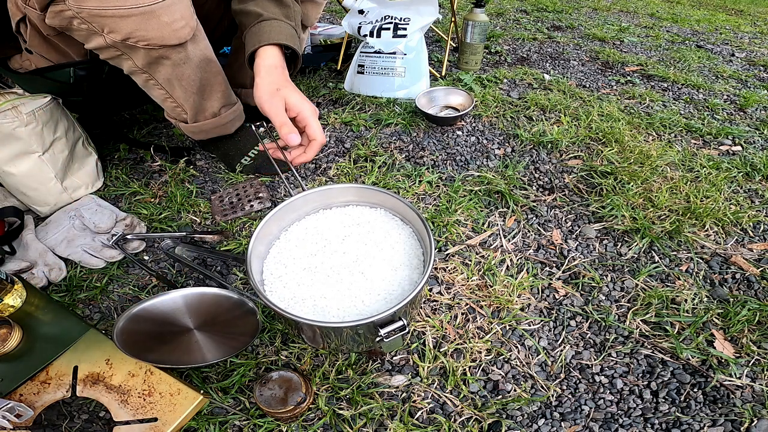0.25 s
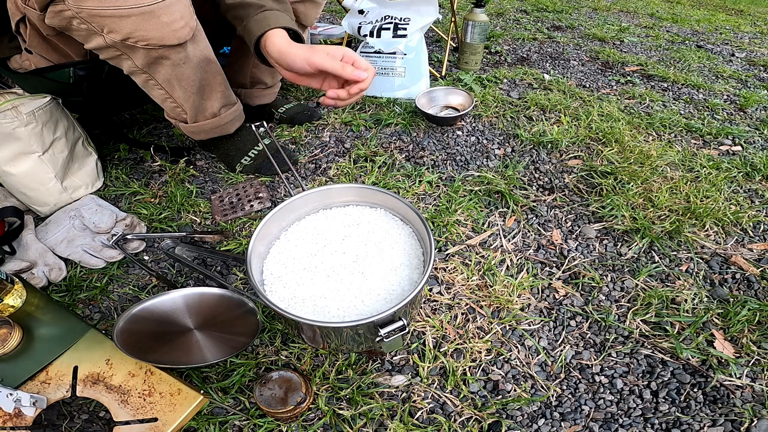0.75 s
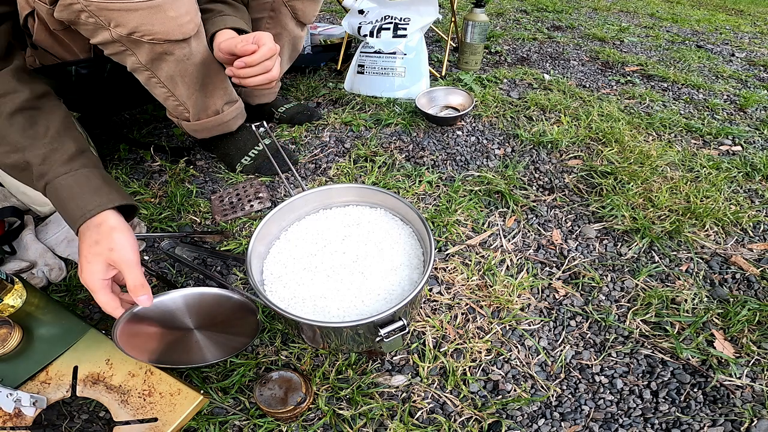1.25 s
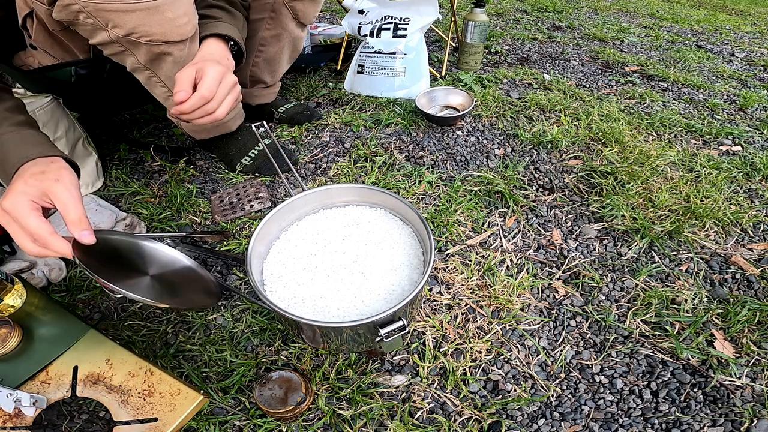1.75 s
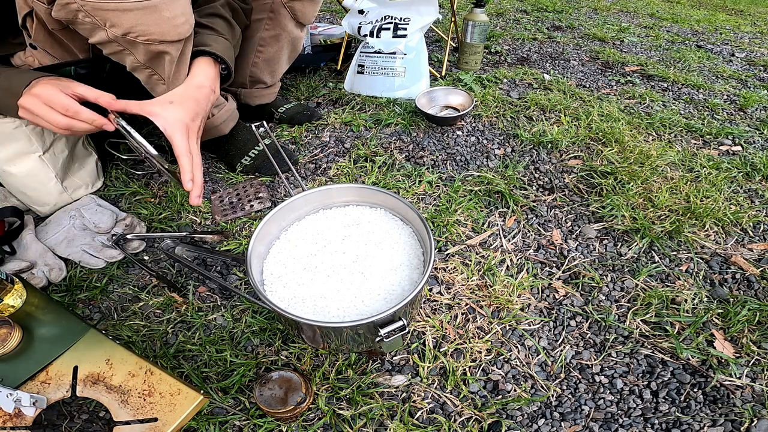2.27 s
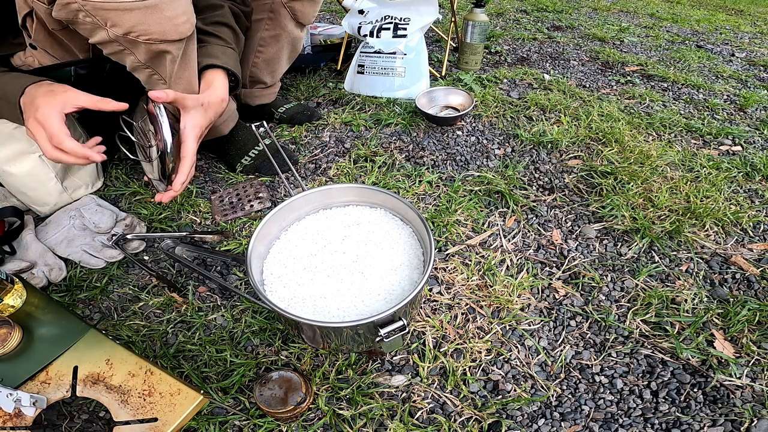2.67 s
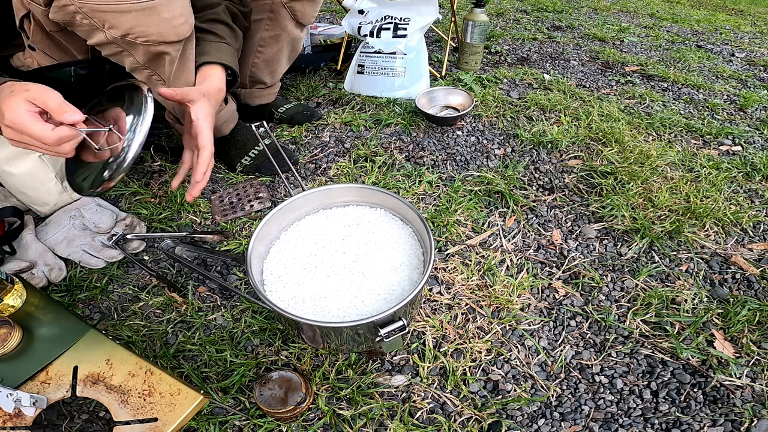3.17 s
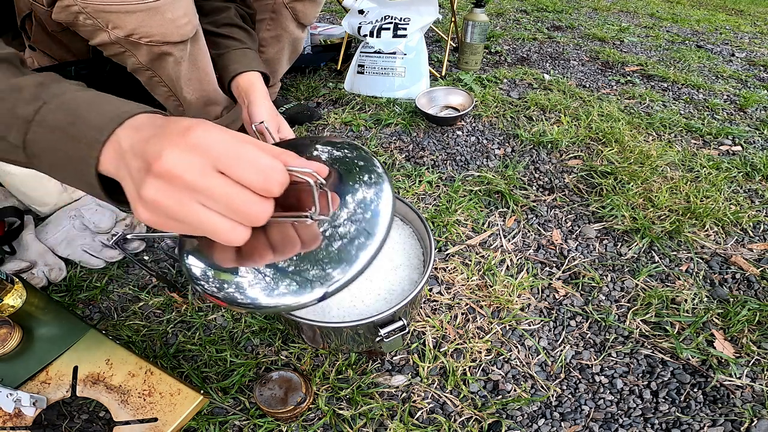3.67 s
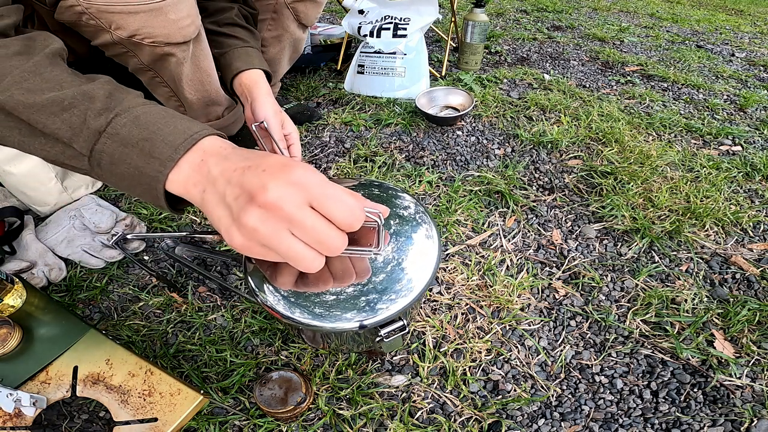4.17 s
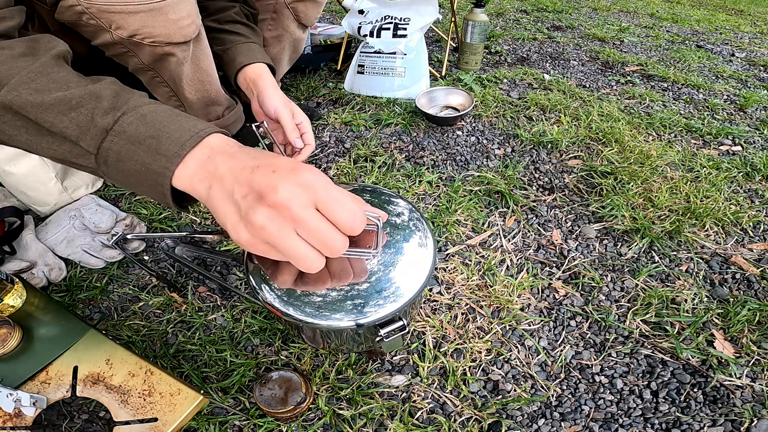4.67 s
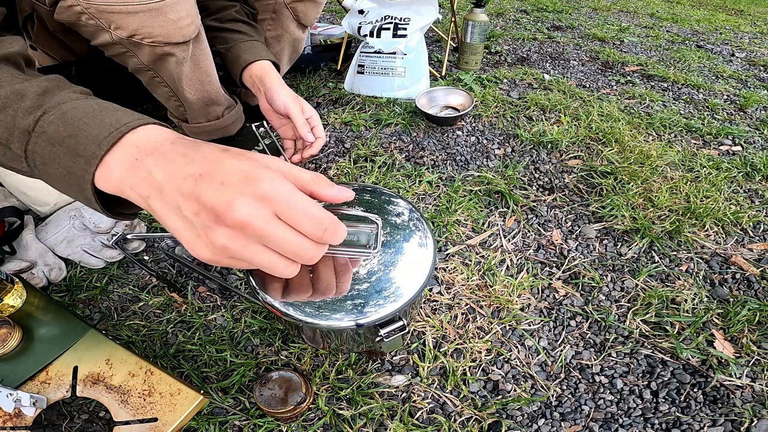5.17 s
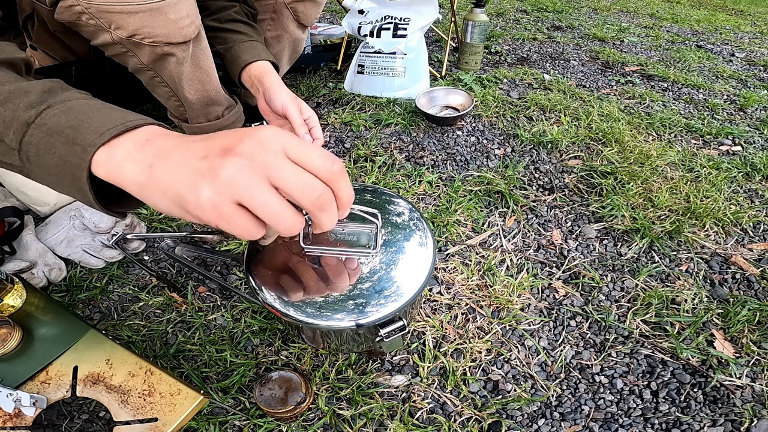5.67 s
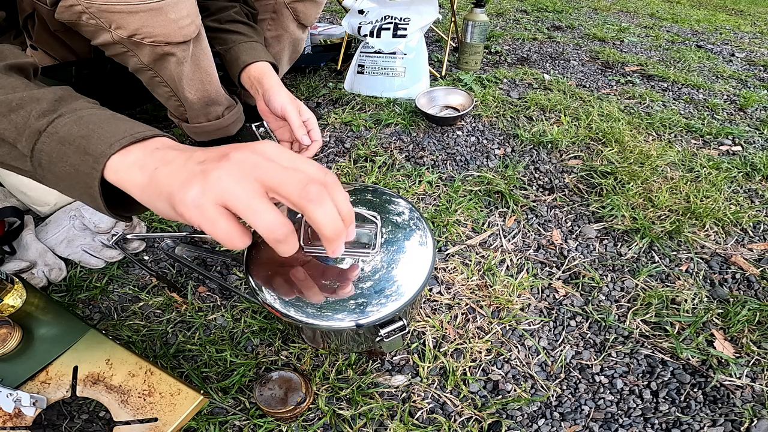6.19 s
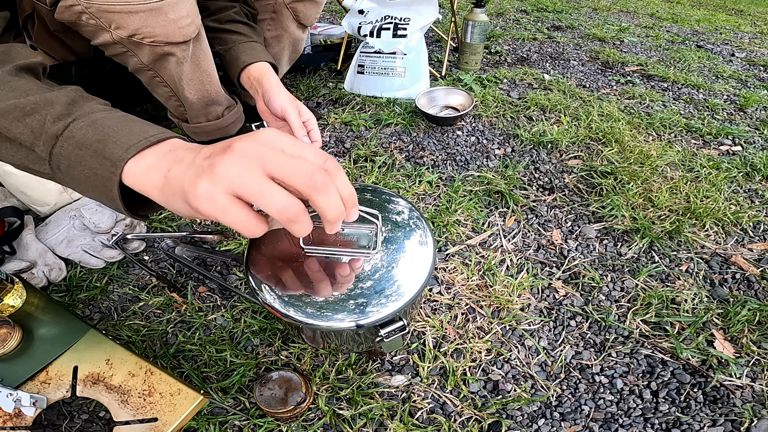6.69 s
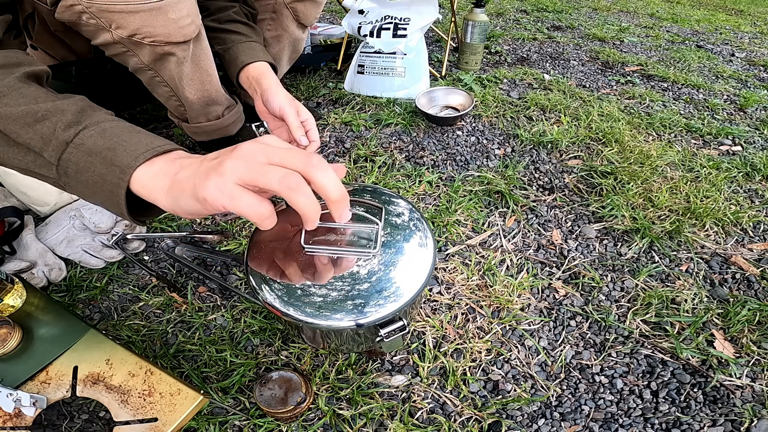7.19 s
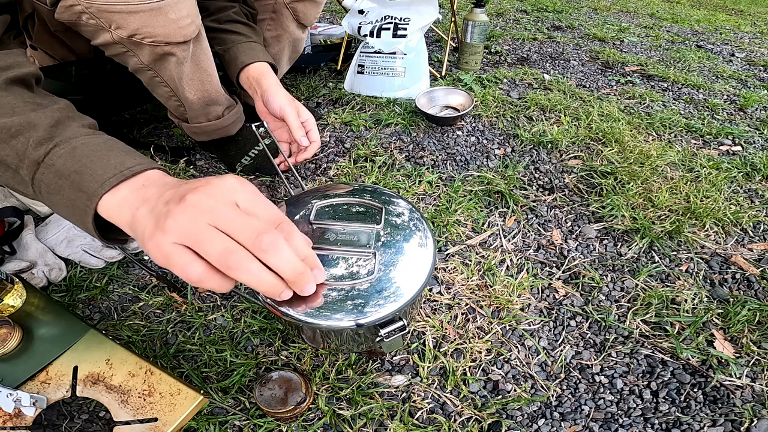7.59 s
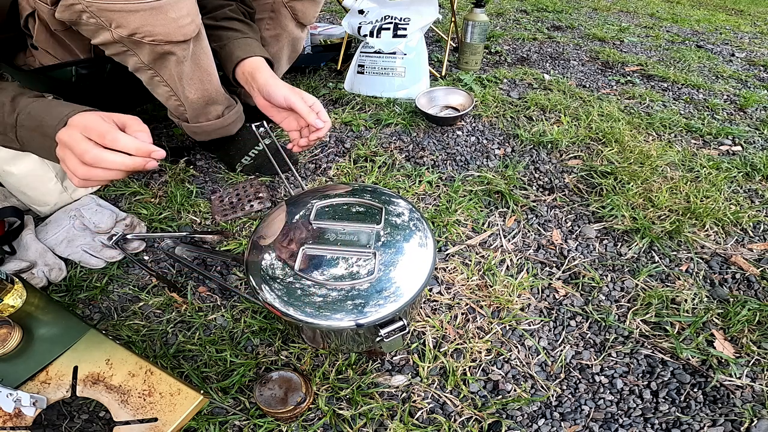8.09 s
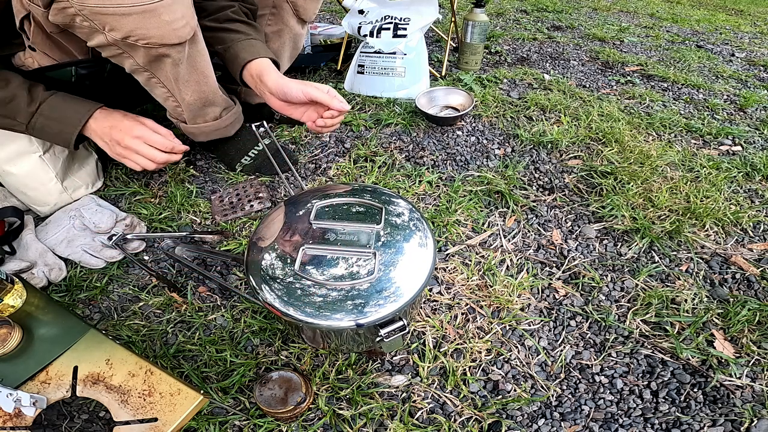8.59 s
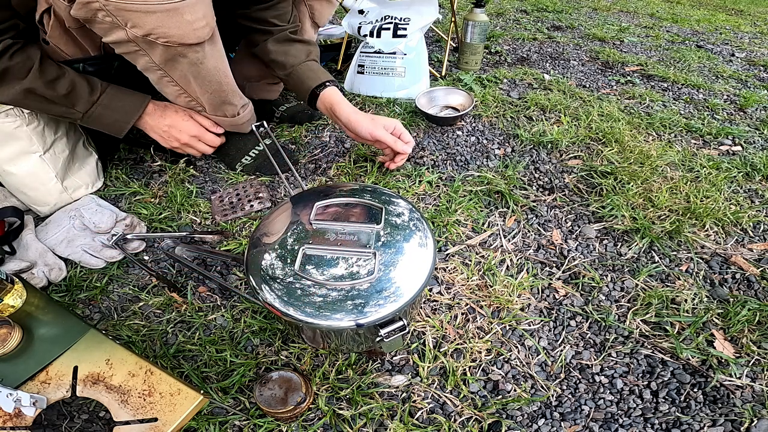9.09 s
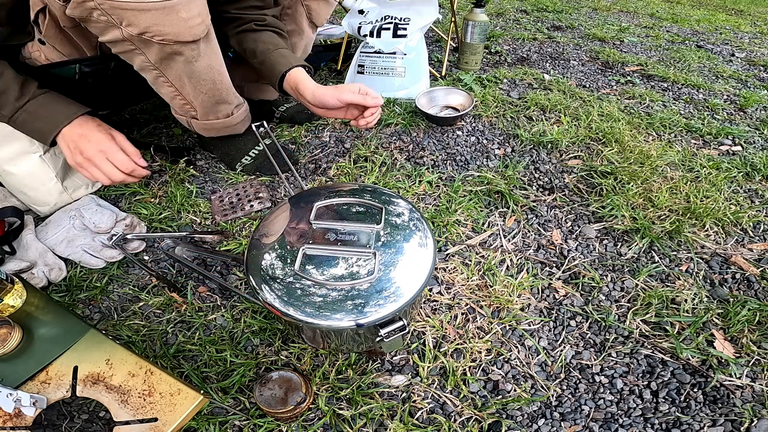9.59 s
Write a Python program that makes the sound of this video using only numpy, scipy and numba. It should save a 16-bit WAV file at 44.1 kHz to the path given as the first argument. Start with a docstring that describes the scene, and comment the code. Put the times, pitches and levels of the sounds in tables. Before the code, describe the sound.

A steady, soft, slightly wavering rush of water fills the open air throughout, without echo. Around 1.1 s clothes rustle and a thin steel lid ticks against stones, then clanks hard at 1.5 s with a short chatter and low thud. At 2.3-2.4 s it rubs briefly through fingers. From 3.8 to 4.2 s light clinks touch a pot's rim; at 5.1-5.4 s steel scrapes in short twists and at 5.45 s the lid seats with a fuller triple knock. Small wire-handle clinks run from 5.6 to 7.8 s, with a stronger clank at 6.75 s. At 8.1 s a handle falls with a loud bright clank and rebound; a tiny falling squeak at 8.47 s leads to another double clank at 8.53 s. Cloth brushes around 8 and 9 s, and a thin rising swish comes near 9.5 s. The background dips after loud hits, then recovers. Close microphone.

```python
"""Water hisses steadily throughout. A steel lid scuffs the ground as it is picked up, with a rustle of clothes.
It slides through the fingers, clinks on a camping pot, is twisted on the rim and settles into it.
Then its wire handles clink, fall onto it and squeak; at the end clothes rustle and a thin swish rises.
Each contact is a blow with tiny bounces that rings the sheet; rubbing is random pulses or an unsteady tone.
The overall level ducks after loud peaks and slowly comes back."""
import sys
import numpy as np
from scipy import signal
from scipy.fft import rfft, irfft
from scipy.io import wavfile
from numba import njit

SR = 44100
rng = np.random.default_rng(int(sys.argv[2]) if len(sys.argv) > 2 else 0)


def dump_mix(stems):
    """Bounce the given channels to the path in sys.argv[1] as a 16-bit WAV at rate SR."""
    frames = np.atleast_2d(stems).T  # one column per channel
    limited = np.clip(frames, -1, 1)  # hard clip at full scale
    pcm = np.round(limited * 32767).astype(np.int16)
    wavfile.write(sys.argv[1], SR, pcm)


N = 434376
TIME = np.arange(N) / SR


def undb(db):
    """Turn decibels into an amplitude factor."""
    return 10 ** (np.asarray(db) / 20)


def unit(x):
    """Scale to rms 1."""
    return x / np.sqrt(np.mean(x ** 2) + 1e-20)


def walk(rate):
    """Smooth random wandering with a spread near 1; rate is in new values per second."""
    count = int(rate * N / SR) + 2
    values = rng.standard_normal(count)
    # joining the values by straight lines shrinks the spread; the factor restores it
    return np.sqrt(3 / 2) * np.interp(TIME * rate, np.arange(count), values)


def colour(x, points, size=2048):
    """Filter with the gain of (frequency [Hz], gain [dB]) points, with no sound before its cause."""
    hz, db = np.transpose(points)
    bin_hz = np.arange(size // 2 + 1) * SR / size
    log_gain = np.interp(np.log(bin_hz + 1), np.log(hz), np.log(undb(db)))
    # folding the cepstrum makes the filter respond as early as possible (minimum phase)
    cepstrum = irfft(log_gain)
    cepstrum[1:size // 2] *= 2
    cepstrum[size // 2 + 1:] = 0
    response = irfft(np.exp(rfft(cepstrum)))
    return signal.oaconvolve(x, response)[:len(x)]


def fade(t, t60):
    """Exponential decay by 60 dB in t60 seconds."""
    return np.exp(-np.log(1000) * t / t60)


def ring(modes, t, extra_db=0, detune=0):
    """Sum of damped modes, each starting up or down at random."""
    hz, db, t60 = np.transpose(modes)
    hz = hz * (1 + detune * rng.standard_normal(len(hz)))
    size = undb(db + extra_db) * rng.choice([-1, 1], len(hz))
    angle = np.outer(2 * np.pi * hz, t).astype(np.float32)
    decay = np.outer(-np.log(1000) / t60, t).astype(np.float32)
    return np.sum(size.astype(np.float32)[:, None] * np.sin(angle) * np.exp(decay), axis=0)


def slips(count, rate, spread_db):
    """Random tiny impacts, rate per second, of uneven size and either direction."""
    chance, size = rng.random(count), rng.standard_normal(count)
    happens = chance < rate / SR
    return happens * undb(spread_db * np.clip(size, -2, 2)) * rng.choice([-1, 1], count)


def strokes(table, attack_s, release_s):
    """Each stroke swells, holds and dies away; attack and release are the times for 60 dB."""
    power = np.zeros(N)
    for s, hold_s, db in table:
        near = slice(max(int((s - attack_s) * SR), 0), int((s + hold_s + release_s) * SR))
        t = TIME[near] - s
        swell = fade(np.maximum(-t, 0), attack_s)
        decay = fade(np.maximum(t - hold_s, 0), release_s)
        power[near] += (undb(db) * swell * decay) ** 2
    return np.sqrt(power)


# tone of the rush of water: (frequency [Hz], relative level [dB])
WATER_TONE = [(22, -37), (45, -15.5), (90, -11), (150, -3), (330, 1), (560, -0.16), (850, -5), (1400, -9),
              (2600, -11), (4500, -19.5), (6800, -31), (9500, -42.5), (12000, -52.5), (14500, -66)]


def water(level_db=-41, swell_db=0.69, gurgle_db=0.2, split_hz=700):
    """A broad rush of noise: the lows waver a little by themselves, and all of it swells slightly together."""
    rush = unit(colour(rng.standard_normal(N), WATER_TONE))
    lows = signal.sosfilt(signal.butter(1, split_hz, fs=SR, output="sos"), rush)
    gurgling = rush + lows * (undb(gurgle_db * walk(12)) - 1)
    return gurgling * undb(level_db + swell_db * walk(1.335))


# tone of brushed cloth: (frequency [Hz], relative level [dB])
CLOTH_TONE = [(300, -13.5), (1200, 2.5), (2500, 0.5), (3600, -9.5), (6500, -22.5), (12000, -50)]
# clothes rustle with each reach of an arm: (time [s], hold [s], level [dB])
REACHES = [(1.12, 0.55, -48.5), (8.0, 0.28, -45), (9.04, 0.093, -46), (9.45, .3, -56)]


def clothes(grain_db=2.0):
    """Fibres brush over each other in uneven little runs."""
    brush = colour(rng.standard_normal(N) * undb(grain_db * walk(60)), CLOTH_TONE)
    return unit(brush) * strokes(REACHES, attack_s=1.1, release_s=2.1)


def glide(from_hz, to_hz, midway_s, glide_s):
    """Pitch that eases from one value to another."""
    return from_hz + (to_hz - from_hz) * (1 + np.tanh((TIME - midway_s) / glide_s)) / 2


def squeal(loudness, hz, jitter, jitter_rate, flutter_db, octave_db):
    """Friction so fast that it has a pitch; period and strength are unsteady."""
    out, on = np.zeros(N), loudness > 0
    unsteady_hz = hz[on] * (1 + jitter * walk(jitter_rate)[on])
    phase = 2 * np.pi * np.cumsum(unsteady_hz) / SR
    tone = np.sin(phase) + undb(octave_db) * np.sin(2 * phase)
    out[on] = unit(tone * undb(flutter_db * walk(500)[on])) * loudness[on]
    return out


# a thin swish, like a sleeve rubbing: (time [s], hold [s], level [dB])
SWISH = [(9.48, .12, -50.5)]
# its rising pitch: (start [Hz], end [Hz], midway [s], glide time [s])
SWISH_GLIDE = (3380, 5470, 9.483, .085)


def swish():
    """A thin rubbing tone swells and rises in pitch."""
    loudness = strokes(SWISH, attack_s=.55, release_s=.55)
    pitch = glide(*SWISH_GLIDE)
    return squeal(loudness, pitch, jitter=0.024, jitter_rate=900, flutter_db=4.0, octave_db=-45)


# a handle squeaks in its hinge: (time [s], hold [s], level [dB])
SQUEAK = [(8.47, 0.0054, -21)]
# its falling pitch: (start [Hz], end [Hz], midway [s], glide time [s])
SQUEAK_GLIDE = (6400, 4930, 8.463, 0.013)


def squeak():
    """Rubbing in the hinge makes a short tone that drops in pitch."""
    loudness = strokes(SQUEAK, attack_s=0.023, release_s=0.057)
    pitch = glide(*SQUEAK_GLIDE)
    return squeal(loudness, pitch, jitter=0.03, jitter_rate=1500, flutter_db=3.0, octave_db=-16)


def scrape(pressure, modes, rate, grit_db, grit_hz=1400):
    """Stick-slip pulses ring the metal's modes, with some dry grit from the contact."""
    t = np.arange(SR // 4) / SR
    grit = colour(rng.standard_normal(len(t)) * fade(t, 0.02), SHEET)
    band = signal.butter(1, [grit_hz / 2, grit_hz * 2], "bandpass", fs=SR, output="sos")
    grit = signal.sosfilt(band, grit)
    response = unit(ring(modes, t)) + undb(grit_db) * unit(grit)
    force = unit(slips(N, rate, spread_db=2)) * pressure
    return signal.oaconvolve(force, response / np.linalg.norm(response))[:N]


# resonances of the hand-held lid: (frequency [Hz], relative level [dB], 60 dB decay time [s])
HELD_LID = [(1210, -5, .04), (1440, -1, .05), (1640, 0, 0.028), (2030, -0.5, 0.068), (2340, 3, .035),
            (2520, -5, 0.11), (2670, 1.5, 0.075), (2850, -15, 0.11), (3850, -11, .05), (4050, -9, 0.086),
            (4570, -8.5, .07), (5100, -12, .1), (5920, -21, .04), (6470, -22, .04)]
# the lid slides through the fingers: (time [s], hold [s], level [dB])
SLIDES = [(2.342, .04, -27.5), (2.423, 0.012, -30)]


def slides():
    """Skin catches and slips on the steel, ringing the lid in the hand."""
    return scrape(strokes(SLIDES, attack_s=.14, release_s=.18), HELD_LID, rate=750, grit_db=-4.5)


# resonances of the rubbed rim: (frequency [Hz], relative level [dB], 60 dB decay time [s])
RUBBED_RIM = [(1024, -8, 0.05), (1300, -3.5, 0.042), (2120, 2.5, 0.051), (2230, 4, 0.037),
              (4010, -10, 0.062), (5100, -24, .08)]
# the lid is twisted on the rim in short pushes: (time [s], hold [s], level [dB])
TWISTS = [(5.11, .004, -39), (5.168, .085, -42.5), (5.353, .006, -27.5), (5.376, .022, -39.5)]


def twists():
    """Steel catches and slips on steel, ringing the rim."""
    return scrape(strokes(TWISTS, attack_s=.03, release_s=.09), RUBBED_RIM, rate=850, grit_db=-8)


# a downward push makes the whole pot thud under a clank: (time [s], level [dB])
THUDS = [(1.468, -34), (6.829, -37), (8.097, -29)]


def thuds(size=4096, lowest_hz=140):
    """The two lowest resonances boom briefly, with little below them; the level is that over 20 ms."""
    out = np.zeros(N + SR)
    for s, db in THUDS:
        boom = ring(SHELL[:2], np.arange(size) / SR)
        start = int(s * SR)
        out[start:start + size] += boom / np.linalg.norm(boom) * np.sqrt(SR / 50) * undb(db)
    return signal.sosfilt(signal.butter(3, lowest_hz, "highpass", fs=SR, output="sos"), out[:N])


# limits of the five bands thud, body, clank, clink and tick: (frequency [Hz])
BAND_EDGES_HZ = [120, 400, 1900, 3300, 7000, 15000]


def voiced(x, band_db, rumble_db=-18):
    """Give a blow its level in each band: place and hardness of the contact decide the balance."""
    edges = np.array(BAND_EDGES_HZ)
    energy = np.cumsum(abs(rfft(x)) ** 2) * 2 / len(x)
    band_energy = np.diff(energy[edges * len(x) // SR])
    have_db = 10 * np.log10(band_energy / (.02 * SR) + 1e-20)  # level over 20 ms
    # each gain is flat inside its band and slides to the next one at the edge
    corners = np.column_stack([edges[:-1] * 1.15, edges[1:] / 1.15]).ravel()
    gain_db = np.repeat(band_db - have_db, 2)
    # so small a body radiates little below its thud
    return colour(x, [(edges[0] / 2, gain_db[0] + rumble_db), *zip(corners, gain_db)])


# ringing modes of the lid: (frequency [Hz], relative level [dB], 60 dB decay time [s])
LID = [(830, -12, .1), (1174, -13, .17), (1535, -8, .1), (2015, -3, .16), (2494, 0, .15), (2720, -6, .12),
       (2960, -1, .14), (3335, -5, .09), (3540, -2, .16), (4060, -8, .11), (4210, -7, .24), (4585, -9, .15),
       (4740, -9, .26), (4865, -9, .16), (5140, -7, .15), (5578, -6, .17), (5760, -14, .22),
       (6436, -14, .22), (7550, -22, .11), (8880, -27, .12), (9593, -22, .18), (10070, -28, .18)]
# broad, quickly damped resonances of lid and pot together:
# (frequency [Hz], relative level [dB], 60 dB decay time [s])
SHELL = [(198, -21.5, 0.053), (281, -16, 0.037), (927, -12, 0.03), (1500, -11.5, 0.018), (2057, -4, 0.024),
         (2478, 2, 0.033), (2690, -4, 0.049), (3410, -3, 0.02), (4170, -6, 0.043), (4610, -4, 0.033),
         (4980, -12.5, 0.061), (5690, -15, 0.028), (6310, -15, 0.022), (9700, -18.5, 0.023)]
# dense response of the thin sheet: (frequency [Hz], relative level [dB])
SHEET = [(60, -22), (170, -13), (700, -1), (1500, -0.5), (2500, 6), (4800, -3.5), (5600, -3.5), (6900, -4),
         (8000, -14), (10000, -12.5), (13000, -29), (16000, -48)]


def knock(chatter_s, ring_db, spot_hz, band_db, size=10240):
    """One blow and the tiny bounces after it ring the lid; the surroundings scatter a faint tail."""
    t = np.arange(size) / SR
    bounces = undb(-8) * slips(size, rate=2200, spread_db=0.5)
    force = bounces * np.exp(-(t / chatter_s) ** 2 / 2)
    force[0] = 1  # the blow itself
    force = force / np.linalg.norm(force)
    shell = ring(SHELL, t, 2.0 * rng.standard_normal(len(SHELL)), detune=.012)
    sheet_fade = fade(t, 0.054) + undb(-33) * fade(t, 0.44)  # sheet, then faint tail
    sheet = colour(rng.standard_normal(size) * sheet_fade, SHEET)
    clatter = signal.fftconvolve(force, shell + 2 * undb(-2) * sheet)[:size]
    # the mode with a belly at the contact spot rings out 11 dB more
    mode_db = ring_db + 0.94 * rng.standard_normal(len(LID))
    mode_db[np.argmin(abs(np.array(LID)[:, 0] - spot_hz))] += 11
    # the long modes build up with the energy that the bounces feed in
    build_up = np.sqrt(np.cumsum(force ** 2))
    long_ring = ring(LID, t, mode_db, detune=0.00064) * build_up
    return voiced(clatter + long_ring, np.array(band_db))


def knocks(table, balance_db):
    """Contacts of one kind share a balance; a harder touch tilts it towards the treble, about the clank band."""
    centres = np.sqrt(np.multiply(BAND_EDGES_HZ[:-1], BAND_EDGES_HZ[1:]))
    octaves = np.log2(centres / centres[2])
    out = np.zeros(N + SR)
    for s, db, brightness, chatter_s, ring_db, spot_hz in table:
        band_db = db + np.array(balance_db) + brightness * octaves
        blow = knock(chatter_s, ring_db, spot_hz, band_db)
        start = int(s * SR)
        out[start:start + len(blow)] += blow
    return out[:N]


# fingers set off ticks while they hold the steel; a span that ends before it starts gives none:
# (start [s], end [s])
HANDLING = [(1.151, 1.35), (2.48, 2.4), (7.85, 6.3)]


def ticks(per_s=8, level_db=-52, spread_db=1.5, chatter_s=.003, ring_db=-21):
    """Faint clinks at loose intervals, each on a random spot of the lid."""
    slots = np.concatenate([np.arange(start, end, 1 / per_s) for start, end in HANDLING])
    rows = []
    for slot in slots:
        s = slot + rng.random() / per_s / 2
        db = level_db + spread_db * rng.standard_normal()
        rows.append((s, db, 0, chatter_s, ring_db, rng.choice(LID)[0]))
    return knocks(rows, CLINK_BALANCE_DB)


# light clinks, first of the lid on the pot's rim, then of its wire handles: (time [s], level [dB],
# brightness [dB per octave], chatter time [s], relative long ring [dB], favoured mode [Hz])
CLINKS = [(3.797, -41.5, -2.5, .018, -2, 2494), (3.824, -37, 1.2, .013, -20, 5140),
          (3.954, -41.5, -4, 0.031, -20, 2494), (4.083, -36, 0, .0024, -10.5, 5760),
          (4.183, -39, 0.8, .009, -23, 5760), (4.214, -41.5, 1, .001, -20, 5760),
          (5.621, -48, 5, .002, -26, 5578), (5.654, -44.5, -1.5, .002, -29, 4585),
          (5.709, -41.5, 0.5, .002, -22, 4585), (5.757, -43, 1, .005, -12, 5578),
          (5.889, -33, 1, 0.0045, -15.5, 4210), (6.558, -38.5, -2.5, 0.00091, -20, 4865),
          (6.828, -30.5, 2, .003, -10.5, 5140), (6.85, -33.5, -1.5, .004, -24, 4210),
          (7.004, -37.5, -.5, 0.0092, -15, 5140), (7.245, -38.5, -0.5, 0.018, -13, 4585),
          (7.285, -34, 0.5, 0.005, -21, 5578), (7.295, -34, .3, 0.0076, -23, 4585),
          (7.636, -41, .5, 0.027, -30, 5578), (7.842, -41.5, -3, 0.0012, -31, 3540),
          (7.983, -44, -2.5, .005, -14, 2494), (8.416, -40, -3, .0055, -19, 2720),
          (8.498, -37, -0.5, .0024, 2, 2720)]
# balance of a clink, one value for each band: (relative level [dB])
CLINK_BALANCE_DB = [-16, -8, -0.5, 0.5, -15.5]


def clinks():
    """Light touches of steel on steel ring the lid."""
    return knocks(CLINKS, CLINK_BALANCE_DB)


# the lid scuffs the stones as it is picked up: (time [s], level [dB], brightness [dB per octave],
# chatter time [s], relative long ring [dB], mode favoured by the contact spot [Hz])
SCUFFS = [(1.103, -31.3, .5, 0.0027, -25, 5140), (1.112, -33.5, -5.5, .005, -5, 830),
          (1.248, -25, 0, 0.0066, -33, 3540), (1.468, -14, -.6, 0.0071, -21, 2015),
          (1.486, -20, -1, .016, -26, 4740), (1.505, -22.5, -1.3, .017, -21, 2015)]
# balance of a scuff, one value for each band: (relative level [dB])
SCUFF_BALANCE_DB = [-26, -4.5, -0.5, 0.5, -17]


def scuffs():
    """Stones knock the lid and make it chatter and ring."""
    return knocks(SCUFFS, SCUFF_BALANCE_DB)


# the lid settles into the rim in three quick steps: (time [s], level [dB],
# brightness [dB per octave], chatter time [s], relative long ring [dB], favoured mode [Hz])
SEATING = [(5.449, -36.5, -2.7, .0025, -22, 2015), (5.459, -33, -2, .003, -22, 2015),
           (5.471, -25, -.8, 0.0044, -22, 4060)]
# balance of a seating step, one value for each band: (relative level [dB])
SEAT_BALANCE_DB = [-11, 1.5, -0.5, -1, -19]


def seating():
    """Lid and rim knock together, with more body than a clink."""
    return knocks(SEATING, SEAT_BALANCE_DB)


# a handle falls flat on the lid and rebounds: (time [s], level [dB], brightness [dB per octave],
# chatter time [s], relative long ring [dB], favoured mode [Hz])
DROPS = [(6.747, -18.5, -1.2, 0.0056, -23, 4210), (8.097, -11.5, -0.55, 0.0016, -14.5, 5578),
         (8.124, -21.5, .9, .013, -19, 6436), (8.527, -13, -.5, 0.0021, -12, 3335),
         (8.535, -12.5, 0.5, .012, -22, 4740)]
# balance of a drop, one value for each band: (relative level [dB])
DROP_BALANCE_DB = [-24.5, -14.5, 0.5, -4.5, -16]


def drops():
    """The falling wire strikes the lid, loudest in the clank band."""
    return knocks(DROPS, DROP_BALANCE_DB)


def widen(mono, split_hz=12500, lag_s=0.000303):
    """Left and right are alike except in the top treble, which is spread wide."""
    top = signal.sosfilt(signal.butter(5, split_hz, "highpass", fs=SR, output="sos"), mono)
    side = np.interp(TIME - lag_s, TIME, top)  # the top treble a moment later
    return np.array([mono + side, mono - side])


def scene():
    """Water and clothes behind the knocks, scrapes and squeaks of the lid, centred below the top treble."""
    background = water() + clothes() + swish()
    rubbing = squeak() + slides() + twists()
    contacts = thuds() + ticks() + clinks() + scuffs() + seating() + drops()
    return widen(background + rubbing + contacts)


@njit
def follow(size, attack, release):
    """Envelope that rises fast and falls slowly."""
    out, e = np.empty(len(size)), 0.
    for i in range(len(size)):
        e += (size[i] - e) * (attack if size[i] > e else release)
        out[i] = e
    return out


def record(dry, threshold_db=-17.0, slope=0.45, attack_s=0.0034, release_s=0.72, top_hz=14900):
    """Gain control, led by the left channel, ducks after loud peaks and creeps back; the top is cut."""
    envelope = follow(abs(dry[0]), 1 / (attack_s * SR), 1 / (release_s * SR))
    gain = np.maximum(envelope / undb(threshold_db), 1) ** -slope
    limited = np.clip(dry * gain, -1, 1)
    return signal.sosfilt(signal.ellip(8, .2, 70, top_hz, fs=SR, output="sos"), limited)


dry = scene()
out = record(dry)
dump_mix(out)
```